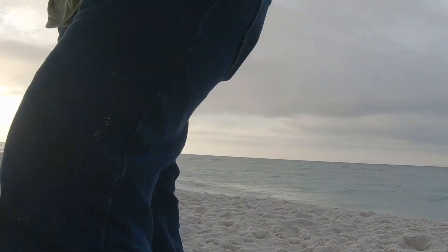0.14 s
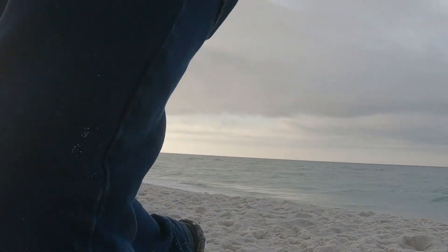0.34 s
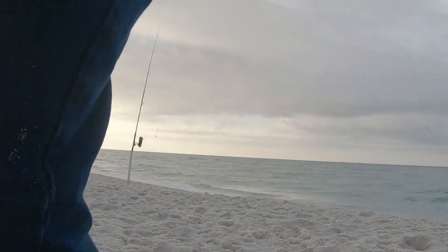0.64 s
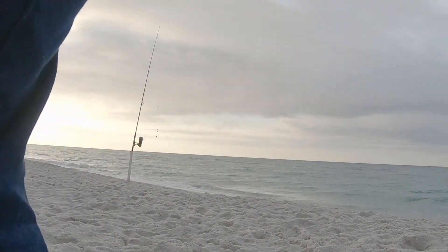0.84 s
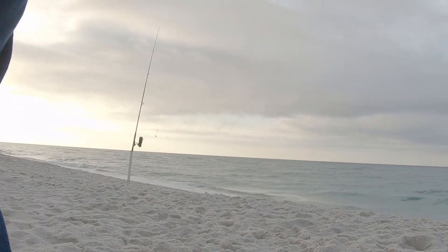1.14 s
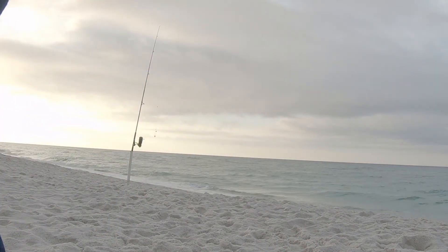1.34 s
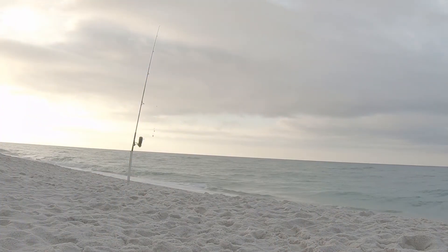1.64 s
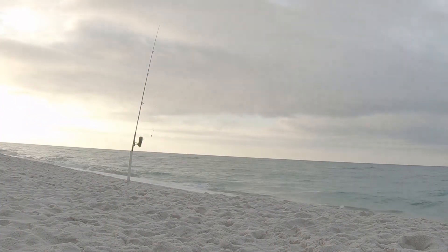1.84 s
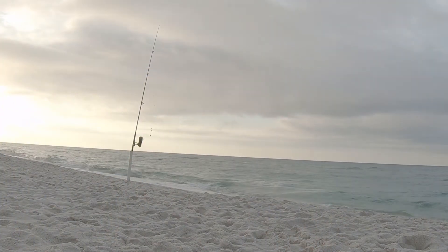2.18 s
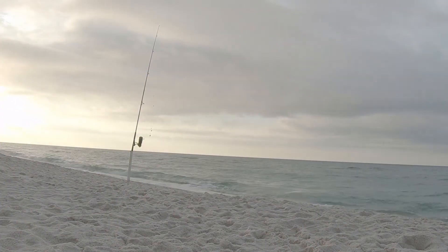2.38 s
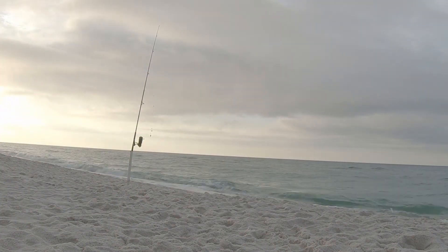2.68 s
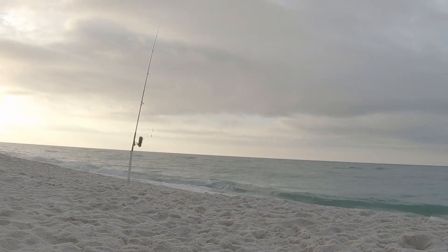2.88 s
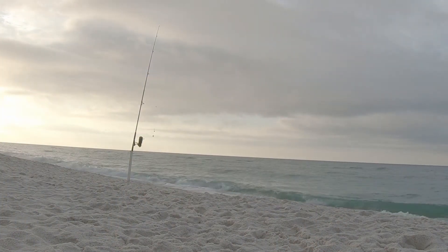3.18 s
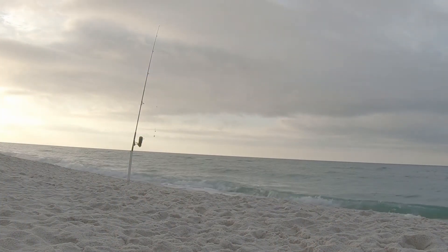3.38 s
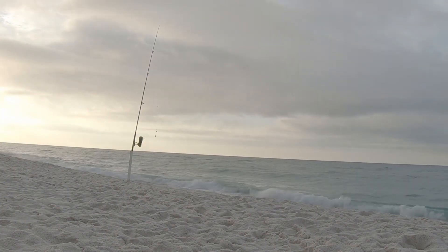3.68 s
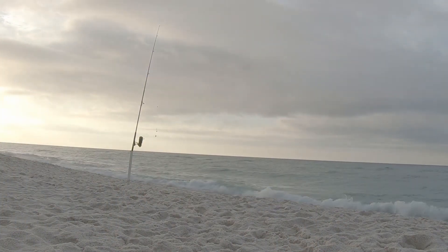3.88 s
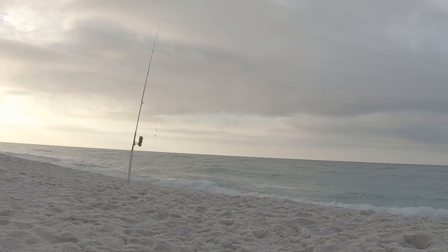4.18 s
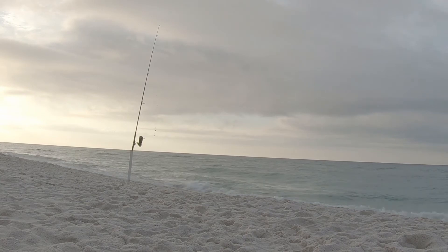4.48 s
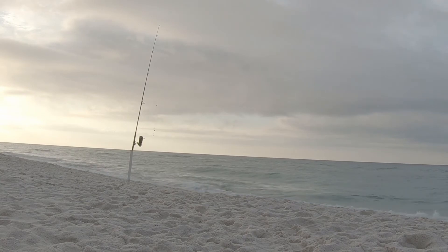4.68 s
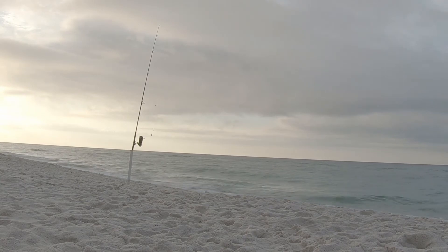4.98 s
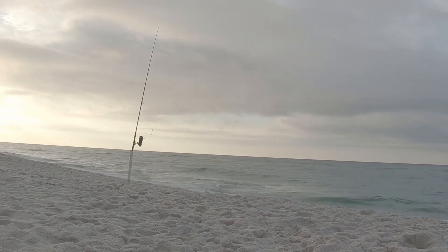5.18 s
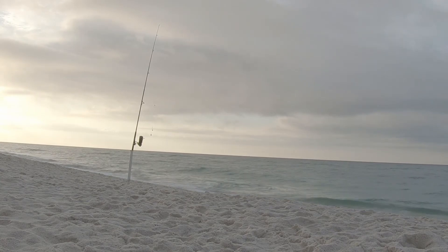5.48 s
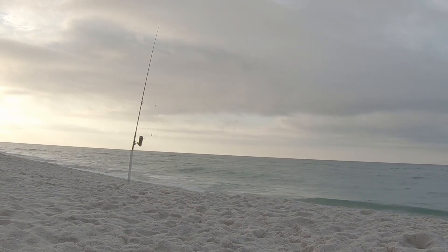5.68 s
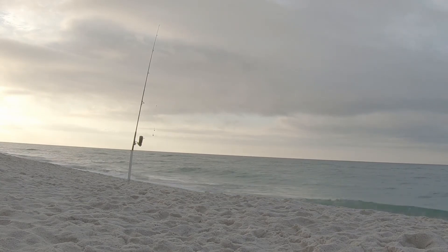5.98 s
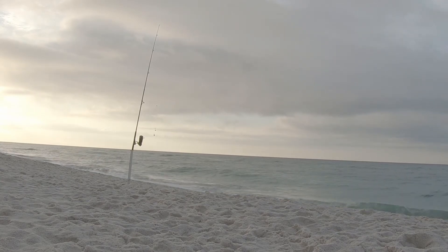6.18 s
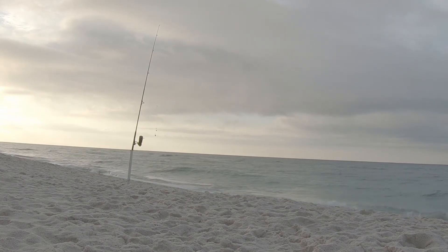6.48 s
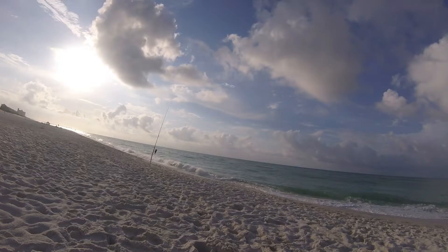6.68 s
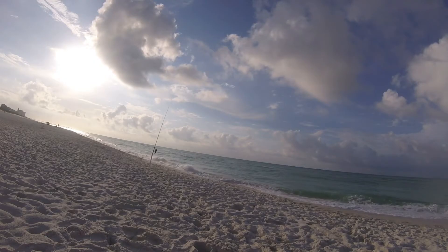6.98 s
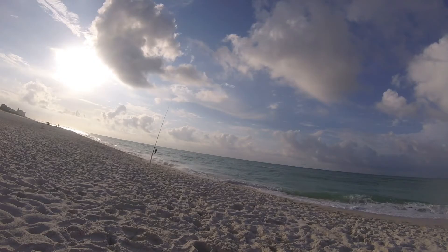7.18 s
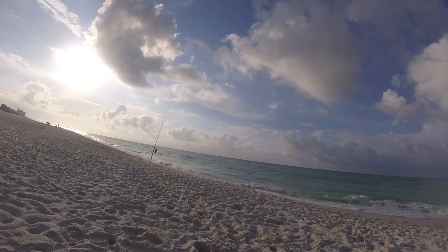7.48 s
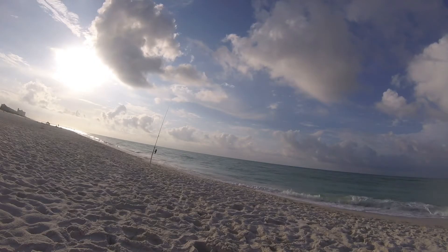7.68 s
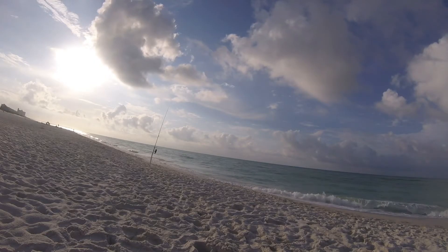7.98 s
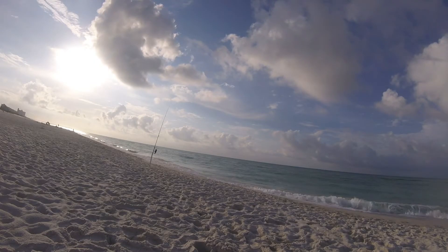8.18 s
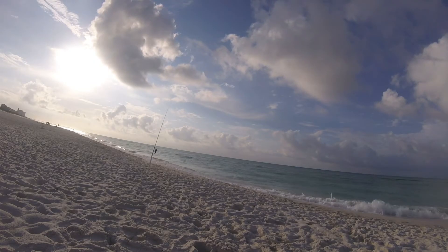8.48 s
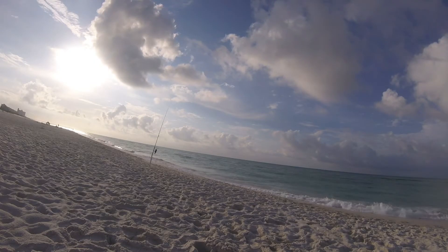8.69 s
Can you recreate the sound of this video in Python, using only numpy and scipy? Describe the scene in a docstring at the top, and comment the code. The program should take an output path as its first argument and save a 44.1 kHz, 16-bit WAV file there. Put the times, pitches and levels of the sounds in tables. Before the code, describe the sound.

Wind rumbles on a low microphone over small beach waves, three flurries of hollow knocks and rustles, then an abrupt change to brighter, steadier surf.

```python
"""Small waves wash up a windy beach, heard low down by a camera; wind rumbles and flutters on its port.
Three flurries of bumps make its hollow stand boom, knock and clack, with cloth and sand rustling.
Then the scene cuts to a livelier sea: brighter surf, splashing crests and a steady wind.
Knocks are sums of decaying modes and a falling click; cloth and sand are grains and shaped noise.
Surf and wind are coloured noise under smooth swells, splashes are coloured grains, eddies single pulses."""
import sys
import numpy as np
from scipy import signal
from scipy.fft import rfft, irfft, next_fast_len
from scipy.io import wavfile
from scipy.ndimage import uniform_filter1d

SR = 44100
rng = np.random.default_rng(int(sys.argv[2]) if len(sys.argv) > 2 else 0)


def unload_audio(sound):
    """Save the sound as a 16-bit wav file, at the path given as the first command line argument."""
    columns = np.transpose(np.atleast_2d(sound))
    # keep every value between -1 and 1, then stretch to whole-number steps
    steps = np.round(np.clip(columns, -1, 1) * 32767)
    wavfile.write(sys.argv[1], SR, steps.astype(np.int16))


N = 390285  # length in samples
CUT_S, CUT_FADE_S = 6.587, 0.004  # centre and length of the crossfade between the two seas


def amp(db):
    """Turns decibels into a linear gain."""
    return 10 ** (np.asarray(db) / 20)


def evened(x):
    """Scales to an rms of one."""
    return x / np.sqrt(np.mean(x ** 2) + 1e-20)


def add(mix, s, sound):
    """Mixes a sound in at time s."""
    part = mix[max(round(s * SR), 0):][:len(sound)]
    part += sound[:len(part)]


def read(points, hz):
    """Reads a spectrum in dB, joined on a log-frequency axis."""
    f, db = np.transpose(points)
    return np.interp(np.log(hz + 1), np.log(f + 1), db)


def tinted(x, colour, low_hz, high_hz):
    """Gives x a colour within a soft-edged band; rms one."""
    size = next_fast_len(len(x))
    hz = np.fft.rfftfreq(size, 1 / SR) + 1
    band = 1 / np.sqrt((1 + (low_hz / hz) ** 10) * (1 + (hz / high_hz) ** 10))
    spectrum = rfft(x, size) * amp(read(colour, hz)) * band
    return evened(irfft(spectrum, size)[:len(x)])


def drift(rate_hz):
    """Smooth random wander of rms one, softened above the given rate."""
    block, step = 4096, 64  # drawn once every 64 samples, in two blocks
    hz = np.fft.rfftfreq(block, step / SR)
    noise = rng.standard_normal((2, block))
    slow = np.concatenate([irfft(rfft(z) / (1 + (hz / rate_hz) ** 2)) for z in noise])
    return evened(np.interp(np.arange(N) / step, np.arange(len(slow)), slow))


def grains(per_s, spread_db):
    """Sparse clicks at random moments and of unequal size; rms one."""
    size = amp(spread_db * np.minimum(rng.exponential(1, N), 4))
    present = rng.random(N) < per_s / SR
    return evened(size * rng.standard_normal(N) * present)


def swell(s, rise_s, fade_s):
    """A smooth hump of height one that peaks at time s."""
    t = np.arange(-3 * rise_s, 3 * fade_s, 1 / SR)
    hump = np.exp(-(t / np.where(t < 0, rise_s, fade_s)) ** 2)
    return np.interp(np.arange(N) / SR, s + t, hump, left=0, right=0)


def contact(t, soft_s):
    """The force of a blow builds up: at once on a hard contact, slowly through cloth."""
    return 1 - np.exp(-(t / soft_s) ** 2)


# Bumps on the stand, levels relative within each layer:
# (time [s], thud level [dB], boom level [dB], boom centre [Hz], knock level [dB], knock centre [Hz],
#  rap level [dB], crack level [dB], grit level [dB], contact softness [s], factor on mode decay [ratio])
BUMPS = [(1.123, -46, -37, 141, -45, 290, -20, -41, -70, 0.0056, 1.2),
         (1.142, -13.5, -8, 109.5, -22.5, 228, -14, -22.5, -50, 0.0031, 1.38),
         (1.189, -26, -11, 115, -9, 228, -30, -27.5, -43, 0.003, 1.5),
         (1.2134, -20, -11, 134, -12, 290, -6.5, -17.5, -38, 0.0019, 0.78),
         (1.285, -23.5, -13.5, 142, -32, 280, -26, -30.5, -40, 0.0073, 1.05),
         (1.374, -17, -5, 110.8, -14, 245, -16, -30.5, -56.5, 0.0018, 0.95),
         (1.386, -38, -14.5, 139, -21, 280, -15, -34, -57, 0.0011, 0.64),
         (1.546, -27, -38, 140, -43, 280, -26, -36, -48.5, 0.0017, 0.47),
         (1.663, -20.5, -11, 143, -18, 293, -17, -30, -47.5, 0.0056, 0.9),
         (1.728, -12, -19, 143, -24.5, 254, -29, -28.5, -50.5, 0.0043, 1.32),
         (1.84, -26, -21.5, 149, -32.5, 300, -41, -37, -66, 0.013, 0.96),
         (3.792, -16, -23, 134, -38, 283, -45, -51, -70, 0.0045, 1.1),
         (3.8431, -17, -6.5, 137, -15.5, 284, -5.5, -19, -35, 0.0038, .9),
         (3.9145, -21, -6.5, 133, -14, 287, -12, -23.5, -45.5, 0.0027, 1.02),
         (4.029, -18.5, -10, 130, -17.5, 280, -11.5, -39.5, -51, 0.0015, 0.31),
         (4.165, -28, -21.5, 134, -41, 280, -50, -60, -67, 0.016, 1.04),
         (4.244, -15.5, -15.5, 117, -38, 279, -25, -31.5, -42.5, 0.0034, 1.3),
         (4.2643, -30, -16, 146, -20.5, 250, -40, -24, -41, 0.0019, 1.3),
         (6.1089, -21, -4.5, 109.5, -6.5, 291, -10, -15, -40, 0.00096, 0.88),
         (6.161, -11, -7, 116.5, -10.5, 283, -23, -15, -36, 0.0016, 1.52),
         (6.1931, -17.5, -10, 137, -11, 280, -18, -23.5, -40.5, 0.0005, 0.92),
         (6.359, -16.5, -8.5, 140, -5.5, 285, -25, -20, -39, 0.0024, 0.64),
         (6.388, -20, -16.5, 135, -29, 202, -35, -47, -62, 0.0026, 1.67),
         (6.507, -22, -23, 125, -9.5, 278, -14.5, -35, -59, 0.0046, 0.53)]
# Modes of the hollow stand: (frequency [Hz], relative level [dB], base t60 [s])
STAND_MODES = [(108, -2, 0.18), (141.4, -1.5, 0.29), (195.3, 0, 0.17), (225.2, 0.5, 0.13),
               (270.5, -2, 0.17), (294.2, -3, 0.19), (426, -9, 0.19), (479.3, -5, 0.077),
               (530.3, -10.5, 0.11), (605, -12.5, 0.21)]


def bumps(ring_db, boom_octaves, knock_db, knock_octaves, rap_hz, rap_octaves, rise_cycles,
          scatter_db, lift_db, lift_s):
    """Each bump rings the stand: where it lands decides which modes boom, knock and rap."""
    out, t = np.zeros(N), np.arange(SR * 3 // 4) / SR
    hz, mode_db, decay = np.transpose(STAND_MODES)[:, :, None]
    chance = rng.standard_normal((len(BUMPS), 2, len(STAND_MODES), 1))
    rise = 1 - np.exp(-t * hz / rise_cycles)  # low modes take longer to build up
    # a new bump lifts what still rings by twice lift_db, easing to lift_db
    lift = amp(lift_db * (1 + np.exp(-t / lift_s)))
    for bump, (load, luck) in zip(BUMPS, chance):
        s, _, boom, boom_hz, knock, knock_hz, rap, _, _, soft_s, decay_factor = bump
        favoured = [(boom, boom_hz, boom_octaves),
                    (knock + knock_db, knock_hz, knock_octaves),
                    (rap, rap_hz, rap_octaves)]
        drive = sum(amp(db) / (1 + (np.log2(hz / centre) / octaves) ** 4)
                    for db, centre, octaves in favoured)
        fall = amp(ring_db + mode_db - 60 * t / (decay * decay_factor))
        envelope = contact(t, soft_s) * rise * fall
        pitch = hz * (1 + 0.022 * load)  # the load on the stand shifts its modes a little
        ring = drive * amp(scatter_db * luck) * envelope * np.sin(2 * np.pi * pitch * t)
        out[round(s * SR):][:len(t)] *= lift
        add(out, s, ring.sum(0))
    return out


def thuds(level_db, rock_hz, swell_s):
    """Each bump also rocks the whole stand, and the sand under it stops it almost at once."""
    out, t = np.zeros(N), np.arange(SR // 6) / SR
    envelope = t / swell_s * np.exp(1 - t / swell_s)
    push = envelope * np.sin(2 * np.pi * rock_hz * t)
    for s, thud, *_ in BUMPS:
        add(out, s, amp(thud + level_db) * push)
    return out


# Hard contacts that clack through the stand: (time [s], peak level before the port [dB])
CLACKS = [(1.1905, -31), (1.2133, -17), (1.3745, -35), (1.389, -39), (1.665, -35), (3.9145, -23),
          (6.1092, -12), (6.161, -13.5), (6.1935, -20.5)]
# Colour of the clack: (frequency [Hz], relative level [dB per Hz])
CLACK_COLOUR = [(500, 8.5), (1200, -9), (2300, -11.5), (3400, -19)]


def clacks(spread_s, top_hz):
    """A hard contact sends a bending wave along the stand; treble arrives first, so the click falls."""
    out, hz = np.zeros(N), np.fft.rfftfreq(2048, 1 / SR)
    delay = spread_s * np.sqrt(top_hz / (hz + 1))
    phase = -2j * np.pi * np.cumsum(delay) * hz[1]
    click = tinted(irfft(np.exp(phase)), CLACK_COLOUR, 520, top_hz)
    for s, db in CLACKS:
        add(out, s, amp(db) * click / abs(click).max())
    return out


# Modes of the camera's hard shell: (frequency [Hz], relative level [dB], t60 [s])
SHELL_MODES = [(750, 1, 0.022), (1055, 1.5, 0.059), (1232, 3.5, 0.062), (1700, -5.5, 0.029),
               (2264, -2.5, 0.022), (2830, -7, 0.019), (3360, 2, 0.026), (6330, -24, .006)]
# Colour of the gritty crack: (frequency [Hz], relative level [dB per Hz])
CRACK_COLOUR = [(500, 15.5), (770, -2.5), (1030, -10), (1300, -6.5), (2200, -10.5), (3300, -23.5),
                (4200, -31), (6500, -39), (10000, -63.5), (15000, -49.5)]


def cracks(tick_db, tick_soft_s, crunch_db, grit_db, spray_s, lumpy, crunch_s, settle_db, settle_s):
    """At each contact the shell ticks and sand is crushed with a crunch and bright grit, then settles."""
    out, t = np.zeros(N), np.arange(SR // 3) / SR
    hz, mode_db, decay = np.transpose(SHELL_MODES)[:, :, None]
    chance = rng.standard_normal((len(BUMPS), 2, len(SHELL_MODES), 1))
    crushed = rng.standard_normal(N) + lumpy * grains(per_s=3300, spread_db=5.0)
    crunch = tinted(crushed, CRACK_COLOUR, 525, 3900)
    grit = tinted(crushed, CRACK_COLOUR, 4430, 16000)
    # level the crunch so that mostly the blow sets its strength
    crunch /= np.sqrt(uniform_filter1d(crunch ** 2, size=300) + .05)
    burst = amp(-60 * t / crunch_s) + amp(settle_db - 60 * t / settle_s)
    for (s, *_, crack, spray, soft_s, _), (load, luck) in zip(BUMPS, chance):
        fall = amp(mode_db + 3.1 * luck - 60 * t / decay)
        modes = fall * np.sin(2 * np.pi * hz * (1 + 0.013 * load) * t)
        # the softer the blow, the weaker its tick
        tick = amp(crack + tick_db) * modes.sum(0) / (1 + soft_s / tick_soft_s)
        now = slice(round(s * SR), round(s * SR) + len(t))
        sand = amp(crack + crunch_db) * crunch[now]
        sand = sand + amp(spray + grit_db) * contact(t, spray_s) * grit[now]
        add(out, s, contact(t, soft_s) * (tick + burst * sand))
    return out


# Cloth and sand strokes on the stand:
# (time [s], relative scrape level [dB], relative hiss level [dB], fade length [s])
BRUSHES = [(1.167, -35, -48, 0.024), (1.209, -21.5, -39, 0.015), (1.255, -33, -57, 0.011),
           (1.315, -52, -36, 0.028), (1.364, -62, -42, .012), (1.408, -37, -55, 0.0036),
           (1.696, -40, -51, 0.026), (1.724, -39.5, -45, 0.019), (1.754, -42.5, -53, 0.054),
           (3.755, -36.5, -39, 0.071), (3.884, -50, -42.5, 0.041), (3.928, -29.5, -56, 0.019),
           (3.957, -46, -40, 0.022), (4.217, -41, -47, 0.044), (4.662, -50, -47, 0.023),
           (6.121, -30, -37, 0.04), (6.18, -34, -40, 0.011), (6.223, -23, -34, 0.047),
           (6.276, -45, -40, 0.03), (6.315, -39, -48, 0.0063), (6.352, -41, -44, 0.03),
           (6.4, -32.5, -49, 0.063), (6.555, -38, -40, 0.027)]
# Colour of the brushing: (frequency [Hz], relative level [dB per Hz])
BRUSH_COLOUR = [(290, 9.5), (360, 0), (450, 7.5), (540, 3), (770, -6.5), (1030, -5), (1300, -9),
                (2200, -14), (3500, -24), (4600, -31.5), (5600, -28), (6500, -36.5), (10000, -54.5),
                (15000, -44.5)]


def brushes(scrape_db, hiss_db, catch_db, grip_share):
    """Each stroke takes hold quickly and slides out: catching fibres and grains scrape and hiss."""
    scrape, hiss = np.zeros((2, N))
    for s, low, high, length in BRUSHES:
        stroke = swell(s, grip_share * length, length)
        scrape += amp(low + scrape_db) * stroke
        hiss += amp(high + hiss_db) * stroke
    friction = grains(per_s=5300, spread_db=0.5) * amp(catch_db * drift(rate_hz=11))
    low_part = scrape * tinted(friction, BRUSH_COLOUR, 180, 4200)
    return low_part + hiss * tinted(friction, BRUSH_COLOUR, 4400, 16000)


# Waves breaking on the shore:
# (crest time [s], relative level [dB], rise [s], fade [s], foam level relative to the wave [dB])
WAVES = [(0.02, -57.5, 0.22, 0.17, -6), (0.95, -65, 0.82, 0.76, -3), (2.7, -54, 0.52, 0.53, -10),
         (3.74, -49, 0.54, 0.32, -10.5), (4.4, -53.5, 1, 0.32, -14), (5.0, -52.5, 0.52, 0.62, -13),
         (5.22, -53, 0.2, 0.15, -29), (6.95, -49, 0.88, 0.49, -3), (7.78, -46.5, 0.34, 0.3, -4.5),
         (8.33, -45, 0.39, 0.12, -4), (8.6, -46.5, 0.24, 0.53, 2.5)]
# Colours of the calm sea, the livelier sea and the deep thunder of falling water:
# (frequency [Hz], relative level [dB per Hz])
CALM_COLOUR = [(120, -44.5), (200, -14), (263, 6.5), (385, -8.5), (479, -5), (525, -11), (1170, -9),
               (2250, -20), (3700, -29.5), (4150, -33), (6130, -39), (8500, -58), (11000, -66),
               (12500, -53), (15500, -75.5)]
LIVELY_COLOUR = [(120, -15), (200, 6), (454, -7), (665, -12.5), (874, -13.5), (3820, -22.5), (5010, -22.5),
                 (5590, -23), (6170, -26), (6530, -23), (7000, -30.5), (8980, -42), (10600, -48.5),
                 (12900, -51), (14200, -60), (15500, -78)]
THUNDER_COLOUR = [(100, 3), (160, -2.5), (300, -14)]


def surf(waves, colour, far_db, far_foam_db, thunder_db, roar_db, wash_db, spray_db, foam_lag_s, churn_db):
    """Over the distant sea each wave thunders, roars and washes; spray and foam hiss a moment later."""
    water, foam = amp(far_db) ** 2, amp(far_foam_db) ** 2  # powers add up
    for s, db, rise, fade, foam_db in waves:
        water = water + (amp(db) * swell(s, rise, fade)) ** 2
        foam = foam + (amp(db + foam_db) * swell(s + foam_lag_s, rise, fade)) ** 2
    water, foam = np.sqrt(water), np.sqrt(foam)
    layers = [(amp(thunder_db) * water, THUNDER_COLOUR),
              (amp(roar_db) * water, colour),
              (amp(wash_db) * water, colour),
              (amp(spray_db) * np.sqrt(water * foam), colour),
              (foam, colour)]
    edges_hz = [100, 280, 700, 1900, 3000, 16000]
    out = np.zeros(N)
    for (gain, tint), low, high in zip(layers, edges_hz, edges_hz[1:]):
        rush = tinted(rng.standard_normal(N), tint, low, high)  # far-off drops merge into a smooth rush
        out += gain * rush * amp(churn_db * drift(rate_hz=19))
    return out


# Crests that topple: (time [s], relative level [dB], fade length [s], band centre [Hz])
SPLASHES = [(7.754, -45, .1, 1150), (7.924, -41.5, .04, 700), (8.137, -45.5, 0.07, 2700),
            (8.323, -44, .1, 1500), (8.54, -43.5, 0.066, 480)]


def splashes(level_db, width_ratio, rise_share):
    """A toppling crest throws a clump of drops and bubbles; bigger bubbles sound lower."""
    out, drops = np.zeros(N), grains(per_s=2600, spread_db=2.0)
    for s, db, length, hz in SPLASHES:
        clump = tinted(drops, LIVELY_COLOUR, hz / width_ratio, hz * width_ratio)
        out += amp(db + level_db) * swell(s, rise_share * length, length) * clump
    return out


# Gusts on the microphone: (time [s], relative level [dB], rise and fade [s])
GUSTS = [(0.083, -30.5, 0.096), (0.318, -28.5, 0.1), (0.497, -34, 0.16), (0.804, -41, 0.48),
         (1.802, -28, 0.13), (2.165, -23, 0.027), (2.487, -32.5, 0.35), (2.88, -22, 0.12),
         (3.14, -27, 0.07), (4.098, -34.5, 0.48), (5.17, -39, 0.13), (7.393, -38.5, 0.29),
         (7.863, -33.5, 0.067), (8.2, -39, 0.43), (8.536, -31, 0.023)]
# Colour of the wind: (frequency [Hz], relative level [dB per Hz])
WIND_COLOUR = [(8.8, -33), (15, -1.5), (38, 0.5), (59, -3.5), (400, -25.5), (520, -54.5), (880, -120)]
FLUTTER_GROWTH = 0.68  # dB of flutter for each dB of gust strength


def wind(breeze_db, lumpy_db, rumble_db, flutter_db):
    """Gusts ride on a steady breeze; turbulence at the port rumbles and flutters in the same lumps."""
    gusts = sum((amp(db) * swell(s, length, length)) ** 2 for s, db, length in GUSTS)
    strength = np.sqrt(amp(breeze_db) ** 2 + gusts)
    deep = tinted(rng.standard_normal(N), WIND_COLOUR, 34, 130)
    # level the rumble so that mostly the gusts set its swell
    deep /= np.sqrt(uniform_filter1d(deep ** 2, size=4000) + 0.13)
    upper = tinted(rng.standard_normal(N), WIND_COLOUR, 109.6, 260)
    lumps = evened(amp(lumpy_db * drift(rate_hz=53.0)))
    rumble = amp(rumble_db) * strength * deep
    flutter = amp(flutter_db) * strength ** FLUTTER_GROWTH * upper
    return lumps * (rumble + flutter)


# Single eddies that slap the microphone: (start time [s], relative peak level [dB], pulse rate [Hz])
EDDIES = [(0.266, -20, 55.7), (0.32, -20.5, 93), (2.157, -16, 123.5), (2.848, -13.5, 46.4),
          (2.865, -14.5, 74), (2.916, -12.5, 38), (3.106, -22, 48.4), (3.137, -23, 28.2),
          (5.135, -21, 45.4)]


def eddies(level_db):
    """Each eddy is one smooth push and pull of pressure."""
    out = np.zeros(N)
    for s, db, hz in EDDIES:
        u = np.arange(SR // 8) / SR * 2 * np.pi * hz - np.pi
        pulse = -u * np.exp((1 - u ** 2) / 2)
        onset = np.minimum((u + np.pi) / 2, 1)  # starts from silence
        add(out, s, amp(db + level_db) * pulse * onset)
    return out


def scene():
    """The calm shore with the bumped stand, then the livelier sea."""
    early = [w for w in WAVES if w[0] < CUT_S]
    late = [w for w in WAVES if w[0] >= CUT_S]
    calm = bumps(ring_db=2.0, boom_octaves=0.35, knock_db=-1.56, knock_octaves=0.33, rap_hz=476,
                 rap_octaves=0.21, rise_cycles=1.0, scatter_db=1.5, lift_db=3.5, lift_s=0.0065)
    calm += thuds(level_db=1.5, rock_hz=70.5, swell_s=0.0079)
    calm += clacks(spread_s=.0015, top_hz=3570)
    calm += cracks(tick_db=-6.5, tick_soft_s=0.00069, crunch_db=0.5, grit_db=-3, spray_s=0.0038,
                   lumpy=0.14, crunch_s=0.061, settle_db=-23.0, settle_s=0.4)
    calm += brushes(scrape_db=0.0, hiss_db=-18.0, catch_db=1.5, grip_share=0.5)
    calm += surf(early, CALM_COLOUR, far_db=-63.5, far_foam_db=-69.0, thunder_db=13, roar_db=7.0,
                 wash_db=-2.2, spray_db=-3.0, foam_lag_s=0.025, churn_db=0.98)
    calm += wind(breeze_db=-45.0, lumpy_db=3.5, rumble_db=2.5, flutter_db=-23.5)
    calm += eddies(level_db=-0.5)
    lively = surf(late, LIVELY_COLOUR, far_db=-45.5, far_foam_db=-50.0, thunder_db=0.0, roar_db=2.0,
                  wash_db=-1.6, spray_db=-4.0, foam_lag_s=0.021, churn_db=0.6)
    lively += splashes(level_db=-1, width_ratio=1.54, rise_share=0.6)
    lively += wind(breeze_db=-40.0, lumpy_db=-3.0, rumble_db=0.0, flutter_db=-12.0)
    cut = np.clip((np.arange(N) / SR - CUT_S) / CUT_FADE_S + .5, 0, 1)
    return (calm * (1 - cut) + lively * cut)[None]


# Peaks and a hollow of the microphone port: (centre [Hz], width [Hz], gain [dB])
PORT = [(3470, 430, 2), (6150, 110, 0), (8620, 1000, 5), (10700, 910, -5)]
EDGE_HZ = 15700  # upper band limit


def record(dry):
    """Rounds off the loudest peaks, then the port colours the treble and the band is limited."""
    hz = np.linspace(0, SR / 2, 513)
    port_db = sum(db * np.exp(-((hz - centre) / width) ** 2) for centre, width, db in PORT)
    port = signal.firwin2(513, hz, amp(port_db), fs=SR)
    rounded = dry / (1 + (dry / .75) ** 4) ** .25  # never exceeds 0.75
    edge = signal.firwin(511, EDGE_HZ, window=("kaiser", 9), fs=SR)
    return signal.oaconvolve(rounded, np.convolve(port, edge)[None], "same")


dry = scene()
out = record(dry)
unload_audio(out)
```